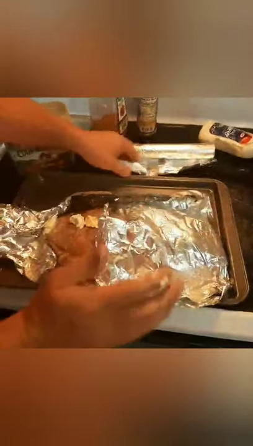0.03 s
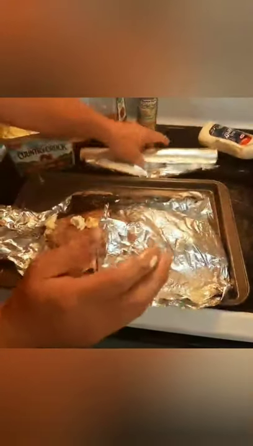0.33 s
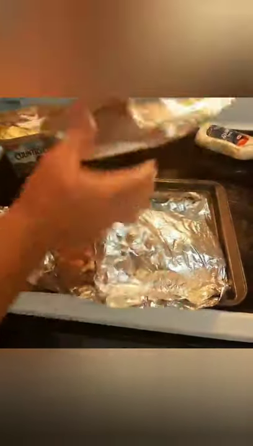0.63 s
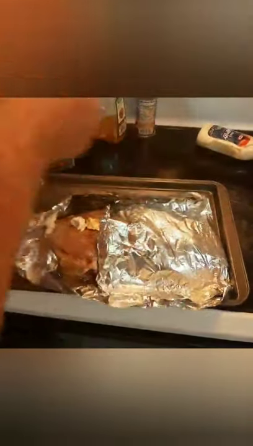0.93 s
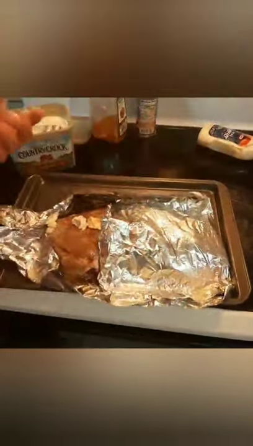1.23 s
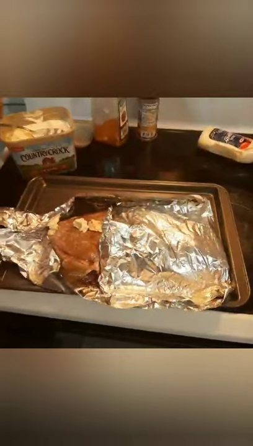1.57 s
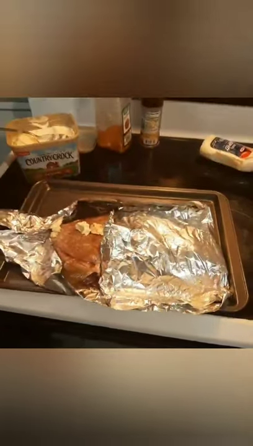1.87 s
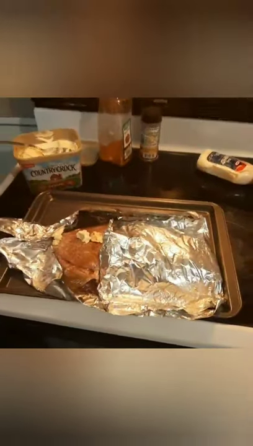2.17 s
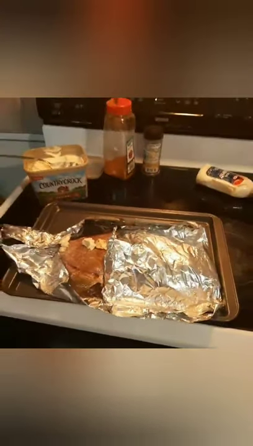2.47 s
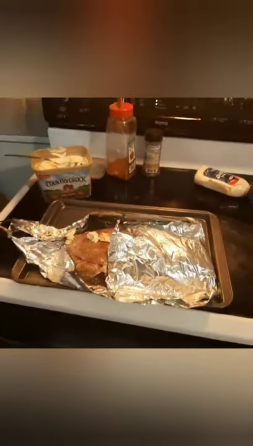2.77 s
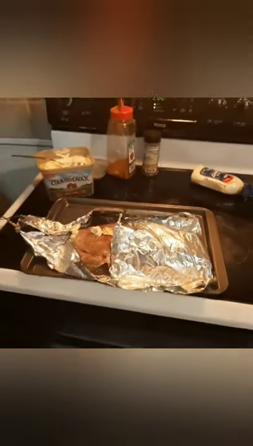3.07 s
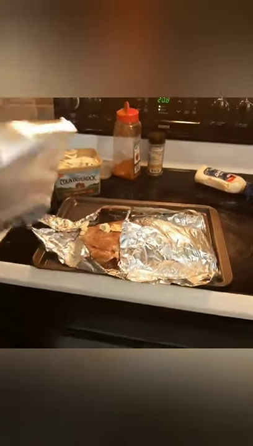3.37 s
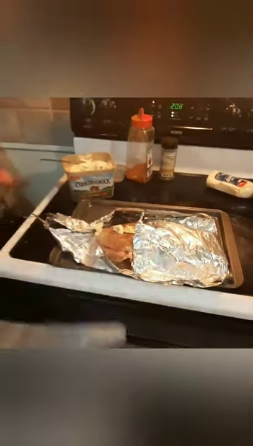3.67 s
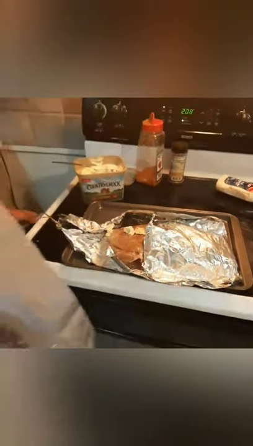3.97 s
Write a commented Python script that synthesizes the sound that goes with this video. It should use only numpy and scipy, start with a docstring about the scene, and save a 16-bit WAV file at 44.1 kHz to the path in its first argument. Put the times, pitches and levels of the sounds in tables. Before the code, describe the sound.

Kitchen foil crackles close by as it is lifted, flapping once at about 0.5 seconds. After a brief lull, steady crinkling with sharp snaps and bright ticks runs from 0.8 seconds. The crumpling is loudest from 2.1 to 3.2 seconds, with a soft bump near 3, then thins to light rustles until 4. A low appliance hum underneath grows fainter in the small, hard room.

```python
"""Kitchen foil crackles close by as it is lifted off a stove top, carried aside and crumpled by hand.
Its creases buckle in swarms of tiny clicks, with brief metallic rings, sharper snaps and bright ticks.
An appliance hums underneath, fainter as the listener draws back.
The sheet flaps once and something bumps softly. A small hard room answers the foil."""
import sys
import numpy as np
from scipy import signal
from scipy.fft import rfft, irfft, next_fast_len
from scipy.io import wavfile
from scipy.ndimage import uniform_filter1d, map_coordinates

SR = 44100
rng = np.random.default_rng(int(sys.argv[2]) if len(sys.argv) > 2 else 0)


def log_audio(samples):
    """Write samples as a 16-bit WAV file to the path given in sys.argv[1]."""
    # one column per channel
    frames = np.atleast_2d(samples).T
    # limit to full scale, then quantise
    limited = np.clip(frames, -1, 1)
    pcm = np.round(limited * 32767).astype(np.int16)
    wavfile.write(sys.argv[1], SR, pcm)


N = 176400
TIME_S = np.arange(N) / SR
SIDES = np.array([[.5], [-.5]])  # left, right
PORT_LAG_S = .0003  # sound reaches the right microphone port later


def amp(db):
    """Decibels to gain."""
    return 10 ** (np.asarray(db) / 20)

def unit(x):
    """Scale to rms 1."""
    return x / np.sqrt(np.mean(x ** 2) + 1e-20)

def along(rows, hz):
    """Interpolate (Hz, value) rows on a log axis."""
    f, v = np.transpose(rows)
    return np.interp(np.log(hz + 1), np.log(f + 1), v)

def curve(rows):
    """Interpolate (s, value) rows per sample."""
    return np.interp(TIME_S, *np.transpose(rows))

def wobble(knots_per_s):
    """Smooth random curve."""
    return map_coordinates(rng.standard_normal(N // 20), [TIME_S * knots_per_s], mode="mirror")

def filtered(x, response):
    """Apply a frequency response."""
    m = next_fast_len(N + SR // 2)
    return irfft(rfft(x, m) * response(np.fft.rfftfreq(m, 1 / SR)), m)[..., :N]

def highpass(x, edge_hz):
    """Fourth-order high-pass."""
    return filtered(x, lambda hz: 1 - 1 / (1 + (hz / edge_hz) ** 4))

def bandpass(x, centre_hz, width_hz):
    """Gaussian band."""
    return filtered(x, lambda hz: np.exp(-((hz - centre_hz) / width_hz) ** 2))

def port_lag(x):
    """Delay right against left."""
    return filtered(x, lambda hz: np.exp(2j * np.pi * hz * SIDES * PORT_LAG_S))


def crackle(spectrum, clicks_per_s, spread_db=2, clump_db=0.4):
    """Buckling clicks of uneven size, in clumps, at an even mean strength."""
    hit = rng.random(N) < clicks_per_s / SR
    size_db = spread_db * np.minimum(rng.exponential(size=N), 5) + clump_db * wobble(130)
    clicks = hit * amp(size_db) * rng.choice([-1, 1], N)
    clicks /= np.sqrt(np.abs(uniform_filter1d(clicks ** 2, size=1100)) + 1e-6)
    return unit(filtered(clicks, lambda hz: amp(along(spectrum, hz))))

# Spectra of the open and the crumpled sheet. Each row: frequency in Hz, relative density in dB.
OPEN_SPECTRUM = [(500, -19.5), (1200, -11), (1600, -8.5), (2100, 1.5), (2450, -1.5), (3100, 4), (3700, 2),
                 (4400, -2.5), (5200, -1.5), (6300, -4.5), (7700, -2.5), (8700, -14.5), (9700, -12),
                 (11000, -5), (13000, -8)]
CRUMPLED_SPECTRUM = [(500, -21), (1200, -9.5), (1600, -6.5), (2100, 3.5), (2500, -0.5), (3000, 4),
                     (4000, -4), (5200, -2), (6300, -1.5), (7800, -5), (8700, -17), (9700, -13),
                     (11000, -5.5), (13000, -14.5)]
def creases(clicks_per_s=3500, crumpled_from_s=3.25):
    """Creases buckle in swarms; the crumpled piece, held aside, sounds thinner."""
    open_sheet = crackle(OPEN_SPECTRUM, clicks_per_s)
    crumpled = crackle(CRUMPLED_SPECTRUM, clicks_per_s)
    return np.where(TIME_S < crumpled_from_s, open_sheet, crumpled)

def facet_rings(rings_per_s=130, centre_hz=7480, spread_oct=.45, t60_s=0.035, spread_db=4, pool=900):
    """Small facets ring briefly, each at its own pitch."""
    t = np.arange(SR // 16) / SR
    onset, chance = rng.random((2, pool, 1))
    sounding = chance < rings_per_s * N / SR / pool
    pitch_hz = np.minimum(centre_hz * 2 ** (spread_oct * rng.standard_normal((pool, 1))), SR / 2)
    size = amp(spread_db * np.minimum(rng.exponential(size=(pool, 1)), 3)) * sounding
    rings = size * amp(-60 * t / t60_s) * np.sin(2 * np.pi * pitch_hz * t)
    index = (onset * N).astype(int) + np.arange(len(t))
    ringing = np.bincount(index.ravel(), rings.ravel(), N)[:N]
    return unit(filtered(ringing, lambda hz: amp(along(OPEN_SPECTRUM, hz))))

# Panel rustle. Each row: time in seconds, relative level in dB.
PANEL_LEVEL = [(0.0, -45.5), (0.29, -60), (0.31, -42.5), (0.49, -42), (0.545, -40), (0.58, -48),
               (0.69, -61), (0.91, -43), (1.08, -49.5), (1.8, -42.5), (1.82, -49), (2.24, -41.5),
               (2.28, -50), (2.32, -44), (2.36, -43), (2.6, -39.5), (2.67, -43), (2.71, -48), (2.75, -36.5),
               (2.83, -44.5), (2.95, -42), (2.98, -33), (3.02, -39), (3.08, -38), (3.12, -41), (3.23, -49),
               (3.73, -56.5), (3.87, -47), (4.0, -56.5)]
# Its spectrum. Each row: frequency in Hz, relative density in dB.
PANEL_SPECTRUM = [(150, -75), (350, -15), (650, -1.5), (850, 1), (1050, 2), (1300, -1.5), (1550, 9),
                  (2200, -16), (4000, -31)]
def panels(gain_db=3):
    """The sheet's broad panels rustle low."""
    return amp(curve(PANEL_LEVEL) + gain_db) * crackle(PANEL_SPECTRUM, clicks_per_s=1500)

# Single creases. Each row: time in seconds, relative level in dB, t60 in seconds.
CREASE_SNAPS = [(0.0195, -21, 0.03), (0.1496, -32, .03), (0.232, -34, .03), (0.303, -23, .03),
                (0.3085, -20, 0.03), (0.317, -15, 0.025), (0.397, -17.5, 0.028), (0.522, -22, 0.041),
                (0.688, -20.5, 0.022), (0.717, -21.5, 0.039), (0.786, -22, 0.022), (0.864, -14.5, 0.019),
                (0.947, -17, 0.03), (0.999, -27, 0.035), (1.331, -20, 0.022), (1.347, -24, 0.022),
                (1.906, -17.5, 0.021), (2.0108, -38, .025), (2.1146, -18, 0.037), (2.151, -18, 0.035),
                (2.311, -15, 0.024), (2.465, -21, .03), (2.61, -25, 0.025), (2.7207, -23, 0.027),
                (2.975, -19, 0.053), (3.0594, -17, 0.031), (3.333, -23, 0.034), (3.3593, -17.5, 0.031),
                (3.411, -25, .03), (3.609, -27.5, 0.03), (3.707, -32, 0.034), (3.724, -42, .03),
                (3.847, -26, 0.033)]
def snaps(gain_db=-4, rise_s=0.0029):
    """A crease runs for a moment, then snaps through."""
    envelope = np.zeros(N)
    for at_s, db, t60_s in CREASE_SNAPS:
        ramp = np.clip((TIME_S - at_s) / rise_s + .5, 0, 1)
        envelope += amp(db + gain_db - 60 * np.abs(TIME_S - at_s) / t60_s) * ramp
    return envelope * crackle(OPEN_SPECTRUM, clicks_per_s=5000)

def fold_colour(x, depth_db=0.5):
    """Each fold has its own colour: random gain patches, about 600 Hz by 35 ms."""
    spectra = signal.stft(x, nperseg=512)[2]
    patches = uniform_filter1d(rng.standard_normal(spectra.shape), size=7, axis=0)
    patches = uniform_filter1d(patches, size=6, axis=1)
    return signal.istft(spectra * amp(depth_db * unit(patches)), nperseg=512)[1][:N]

# How hard the hand works the foil. Each row: time in seconds, relative level in dB.
WORK_LIFT = [(0.0, -40.5), (0.018, -30), (0.038, -32.5), (0.088, -42), (0.178, -38), (0.194, -60),
             (0.202, -40), (0.29, -54), (0.314, -31), (0.36, -32.5), (0.39, -30.5), (0.425, -34),
             (0.46, -28), (0.508, -30.5), (0.524, -25), (0.546, -27), (0.575, -34), (0.62, -47),
             (0.66, -52), (0.68, -54), (0.688, -37.5), (0.726, -37.5), (0.76, -47)]
WORK_FOLD = [(0.765, -45), (0.773, -30.5), (0.787, -27.5), (0.853, -37), (0.869, -29.5), (1.013, -34),
             (1.095, -40), (1.109, -36), (1.281, -32.5), (1.322, -30), (1.34, -26), (1.375, -33),
             (1.429, -34.5), (1.467, -35), (1.555, -30), (1.607, -35), (1.685, -27.5), (1.749, -32),
             (1.771, -27), (1.857, -35.5), (1.883, -40.5), (1.923, -34.5), (1.945, -36.5), (1.979, -33),
             (1.987, -35.5), (2.065, -28.5), (2.1, -37.5)]
WORK_CRUMPLE = [(2.11, -37.5), (2.128, -26.5), (2.18, -23.5), (2.226, -28.5), (2.278, -37), (2.325, -24),
                (2.386, -32), (2.42, -28), (2.446, -32.5), (2.494, -26.5), (2.552, -29), (2.568, -25.5),
                (2.604, -30.5), (2.62, -22.5), (2.67, -31), (2.714, -34), (2.726, -26.5), (2.79, -26),
                (2.86, -28), (2.962, -31.5), (2.978, -24), (3.036, -26), (3.072, -22), (3.105, -30),
                (3.15, -26.5), (3.2, -34.5), (3.27, -41.5)]
WORK_SETTLE = [(3.28, -43.5), (3.368, -39), (3.398, -47), (3.434, -37), (3.548, -41.5), (3.578, -52),
               (3.626, -38.5), (3.64, -47), (3.695, -54), (3.73, -43.5), (3.802, -45), (3.85, -35),
               (3.928, -43.5), (3.938, -38), (4.0, -43.5)]
# Treble and coarse crunch. Each row: time in seconds, extra gain in dB.
TREBLE_GAIN = [(0, 0.5), (.3, -2.5), (.47, 0.5), (.55, 3.5), (.8, 0), (.97, 1.5), (1.1, 1.5), (1.33, 0.5),
               (1.45, 3), (1.8, -2.5), (2.16, 0.5), (2.32, -0.5), (2.55, -2.5), (2.8, 4.5), (2.92, -5),
               (3.02, 2.5), (3.17, -3.5), (3.38, 2), (3.65, -4.5), (3.95, -1.5), (4, -4)]
CRUNCH_GAIN = [(0, -3.5), (.15, -4), (.35, -4), (.48, -2), (.54, 1.5), (.66, -11), (.8, -3.5), (.9, -2.5),
               (1.15, 1.5), (1.35, -2), (1.75, -2), (2.1, -3), (2.3, 0), (2.55, 0), (2.62, -5.5),
               (2.665, 5.5), (2.73, -2), (2.8, 2), (3.07, -1), (3.14, -7.5), (3.25, -1), (3.38, -3.5),
               (3.6, -4.5)]
def foil(crinkle_db=3, ring_db=-11, treble_db_per_db=0.1109, neutral_db=-61):
    """Harder work makes the creases louder and brighter; snaps and panels join in."""
    work_db = curve([*WORK_LIFT, *WORK_FOLD, *WORK_CRUMPLE, *WORK_SETTLE])
    crinkle = amp(work_db + crinkle_db) * (creases() + amp(ring_db) * facet_rings()) + snaps()
    treble_db = treble_db_per_db * (work_db - neutral_db) + curve(TREBLE_GAIN)
    treble = (amp(treble_db) - 1) * highpass(crinkle, edge_hz=8050)
    crunch = (amp(curve(CRUNCH_GAIN)) - 1) * bandpass(crinkle, centre_hz=3200, width_hz=800)
    return fold_colour(crinkle + treble + crunch + panels())

# Kitchen decay. Each row: frequency in Hz, t60 in seconds.
ROOM_T60 = [(200, 0.11), (2500, 0.48), (7000, 0.41), (13000, 0.14)]
def room_response(direct_db=-1.5, bounce_db=1, bounce_decay_s=0.0085, tail_db=-5):
    """Paths to both ports: direct sound, bounces off stove and wall, diffuse tail."""
    normed = lambda x: x / np.linalg.norm(x, axis=1, keepdims=True)
    hz, t, noise = signal.stft(rng.standard_normal((2, SR // 3)), SR, nperseg=256)
    tail = signal.istft(noise * amp(-60 * t / along(ROOM_T60, hz)[:, None]), SR, nperseg=256)[1]
    t = np.arange(tail.shape[1]) / SR
    bounces = rng.standard_normal(tail.shape) * (rng.random(tail.shape) < .04)
    bounces *= np.exp(-t / bounce_decay_s)
    response = amp(tail_db) * normed(tail) + amp(bounce_db) * normed(bounces)
    response[0, 0] += amp(direct_db)
    response[1, int(PORT_LAG_S * SR * rng.uniform(.5, 1.5))] += amp(direct_db)
    return normed(response)

def kitchen(x, positions=125):
    """The paths keep changing, as each crease lies elsewhere on the moving sheet."""
    out, hop = np.zeros((2, N + 2 * SR)), N // positions
    padded = np.pad(x, (hop, 3 * hop))
    fade = np.sin(np.pi * np.arange(2 * hop) / (2 * hop))
    for k in range(positions + 1):
        grain = padded[k * hop:][:2 * hop] * fade
        echoed = signal.fftconvolve(grain[None], room_response(), axes=1)
        start = k * hop + rng.integers(30)
        out[:, start:start + echoed.shape[1]] += echoed
    return out[:, hop:hop + N]

# Motor tones. Each row: frequency in Hz, relative level in dB.
MOTOR_TONES = [(58.2, -61), (68.6, -59), (116.4, -55.5), (137.1, -53), (178, -56), (205.7, -48), (488, -63)]
# Air noise. Each row: frequency in Hz, relative density in dB.
AIR_SPECTRUM = [(20, -9), (40, -12), (60, 8), (90, -7), (145, 4.5), (190, 4), (215, 8.5), (245, 2),
                (330, 1.5), (400, -2), (490, 2), (600, -4.5), (1000, -9.5), (2000, -5.5), (4000, -17),
                (7500, -37), (9000, -28), (13000, -42.5)]
# Its stereo likeness. Each row: frequency in Hz, left-right correlation.
AIR_CORRELATION = [(30, 1), (70, 1), (130, 1), (220, 1), (370, 1), (670, .6), (1200, 0.22), (2500, 0.64)]
# Nearness of the appliance. Each row: time in seconds, air noise gain in dB.
NEARNESS = [(0, 0.5), (.4, 1), (1.1, -0.5), (1.5, -1), (2.05, 0), (2.35, -3.5), (2.9, -1.5), (3.3, -5),
            (4, -5.5)]
def appliance(waver_db=1, drift_rad=0.05, air_db=-39.5, hum_db_per_db=1.17):
    """An unsteady motor hums over moving air; the hum fades faster with distance."""
    hum = np.zeros(N)
    for hz, db in MOTOR_TONES:
        peak = np.sqrt(2) * amp(db + waver_db * wobble(3.4))
        hum += peak * np.sin(2 * np.pi * (hz * TIME_S + rng.random()) + drift_rad * wobble(3.2))

    def mid_side(hz):
        angle = np.arccos(np.clip(along(AIR_CORRELATION, hz), -1, 1)) / 2
        return amp(along(AIR_SPECTRUM, hz)) * [np.cos(angle), np.sin(angle)]

    mid, side = filtered(rng.standard_normal((2, N)), mid_side)
    air = unit(np.array([mid + side, mid - side]))
    near_db = curve(NEARNESS)
    return amp(hum_db_per_db * near_db) * hum + amp(near_db + air_db) * air

# Kinks facing the listener. Each row: start in seconds, relative level in dB, t60 in seconds.
KINK_TICKS = [(0.309, -30, 0.018), (0.689, -24.5, .022), (.7775, -29, .015), (.8695, -17, .004),
              (0.9527, -10, .004), (.9995, -15, 0.0044), (1.1525, -25, .003), (1.334, -18, .012),
              (1.3465, -25, .008), (1.4339, -11, .004), (1.4903, -18, 0.011), (2.223, -17, .003),
              (2.2335, -21, .003), (2.786, -10, .003), (3.362, -35, .025), (3.611, -45, 0.027)]
def ticks(pan_db=7, room_db=-6):
    """A kink gives at once: a thin crack that arrives mostly directly."""
    envelope = sum(amp(db - 60 * np.abs(TIME_S - start_s) / t60_s) * (TIME_S >= start_s)
                   for start_s, db, t60_s in KINK_TICKS)
    crack = highpass(envelope * rng.standard_normal(N), edge_hz=4800)
    room = signal.fftconvolve(crack[None], room_response(), axes=1)[:, :N]
    return amp(SIDES * pan_db) * (port_lag(crack) + amp(room_db) * room)

# Soft blows. Each row: peak time in seconds, level in dB, centre and width in Hz,
# rise and fall time constants in seconds.
SOFT_BLOWS = [(.54, -31.5, 560, 220, 0.027, 0.013), (0.869, -38, 447, 200, 0.018, 0.012),
              (.95, -37.5, 210, 60, 0.046, 0.038), (2.313, -37, 543, 300, 0.0051, 0.0084),
              (2.98, -41, 103, 40.4, .025, 0.021), (3.008, -31.5, 122, 111, 0.0044, 0.016)]
def bumps():
    """A flap of the sheet and soft bumps: short swells of low, damped vibration."""
    out = np.zeros(N)
    for peak_s, db, centre_hz, width_hz, rise_s, fall_s in SOFT_BLOWS:
        age_s = TIME_S - peak_s
        envelope = np.exp(-np.where(age_s < 0, -age_s / rise_s, age_s / fall_s))
        blow = bandpass(rng.standard_normal(N), centre_hz, width_hz) * envelope
        out += amp(db) * blow * np.linalg.norm(envelope) / np.linalg.norm(blow)
    return out

# Port imbalance. Each row: frequency in Hz, left minus right in dB.
PORT_BALANCE = [(400, -9), (700, 6), (1100, -4.5), (1500, 1.5), (2100, -4.5), (3200, -2), (4300, 0.5),
                (5300, 1.5), (6300, -2), (7500, 1), (8700, 5), (10000, 4), (13000, 6.5)]
# Sheet position. Each row: time in seconds, left minus right in dB.
SHEET_PAN = [(0.0, 1.5), (0.21, -0.5), (0.46, 2), (0.65, -1.5), (0.72, 2.5), (1.16, 0.5), (1.34, 2),
             (3.39, -1.5), (3.52, -4.5), (4.0, -1)]
def scene():
    """The foil moves between the two ports, over hum and bumps."""
    sheet = filtered(kitchen(foil()), lambda hz: amp(SIDES * along(PORT_BALANCE, hz)))
    low = port_lag(bumps() + appliance())
    return sheet * amp(SIDES * curve(SHEET_PAN)) + ticks() + low

def record(dry):
    """Steep band limit on the treble."""
    top_hz, slope_width_hz = 13150, 200
    return filtered(dry, lambda hz: np.clip((top_hz - hz) / slope_width_hz + .5, 0, 1))


dry = scene()
out = record(dry)
log_audio(out)
```